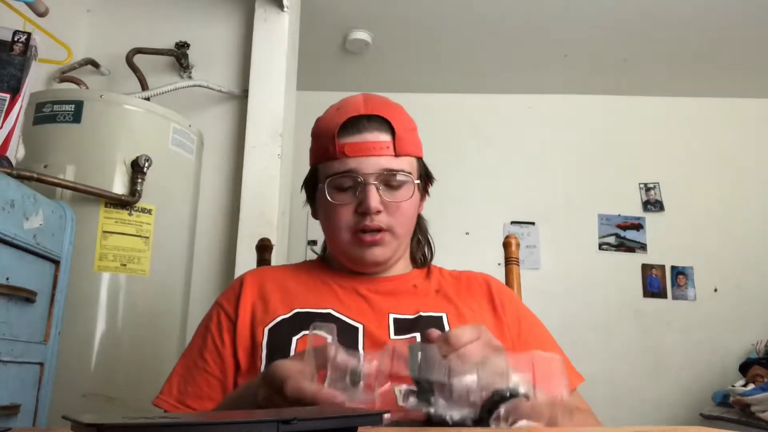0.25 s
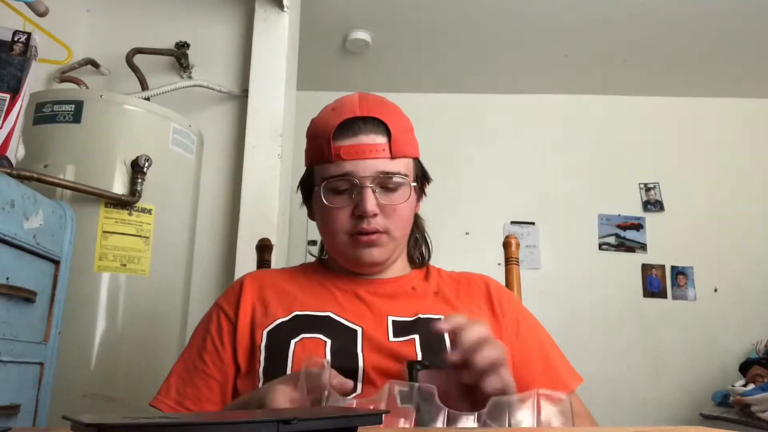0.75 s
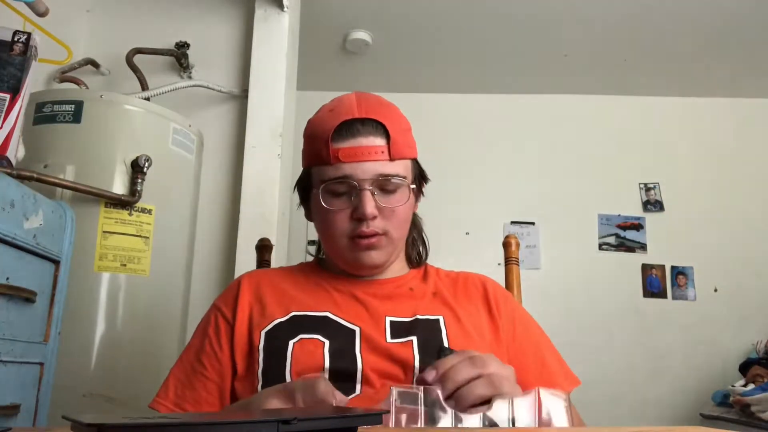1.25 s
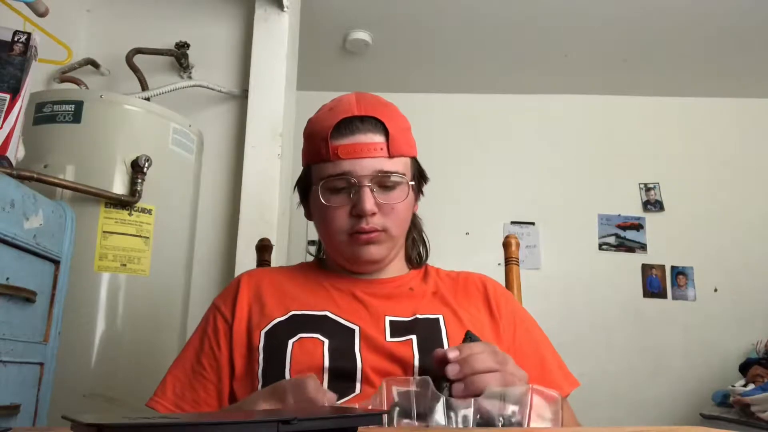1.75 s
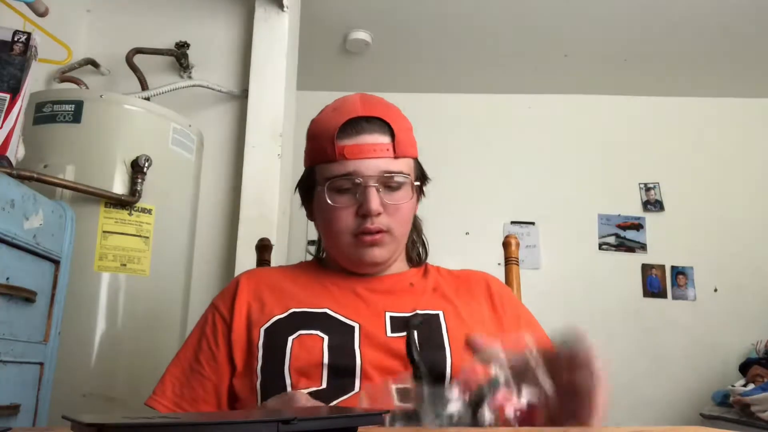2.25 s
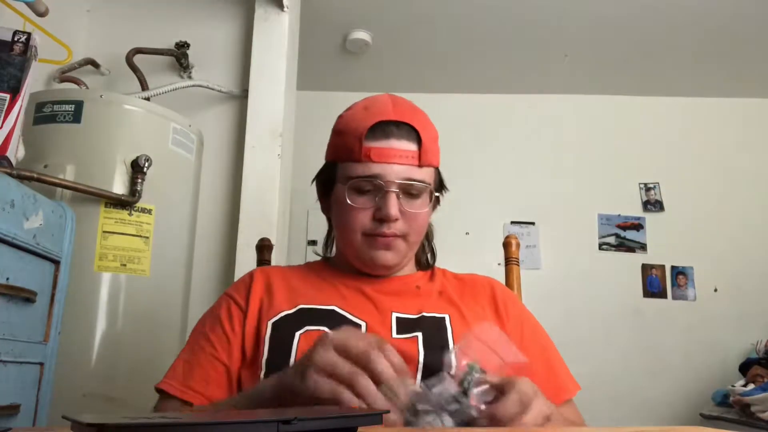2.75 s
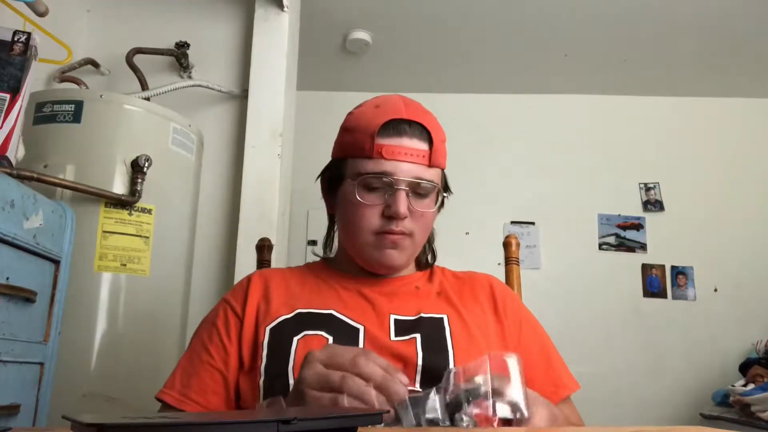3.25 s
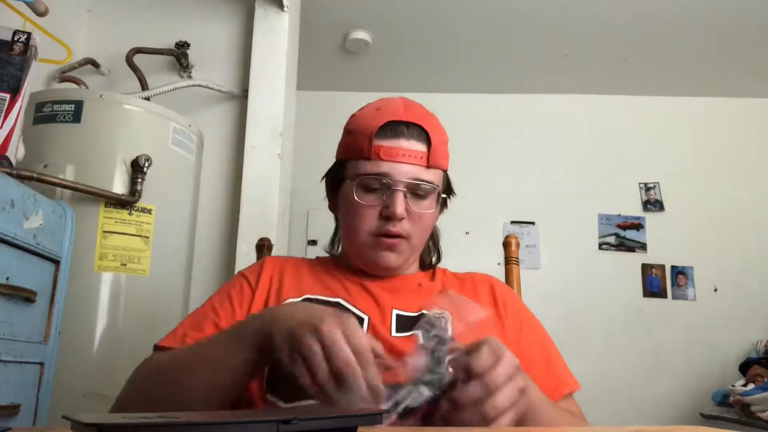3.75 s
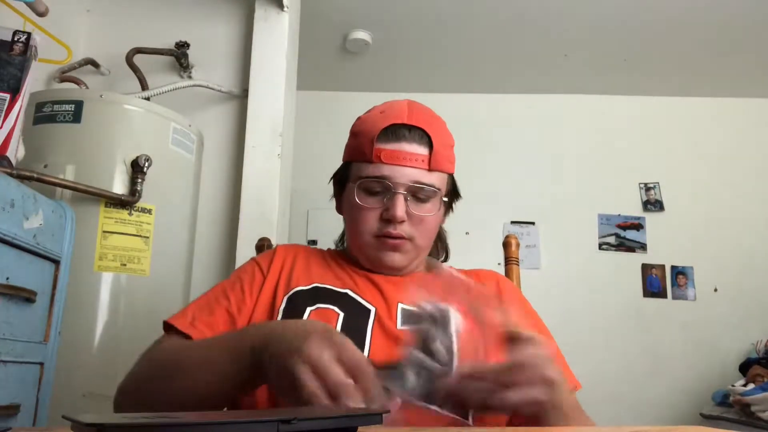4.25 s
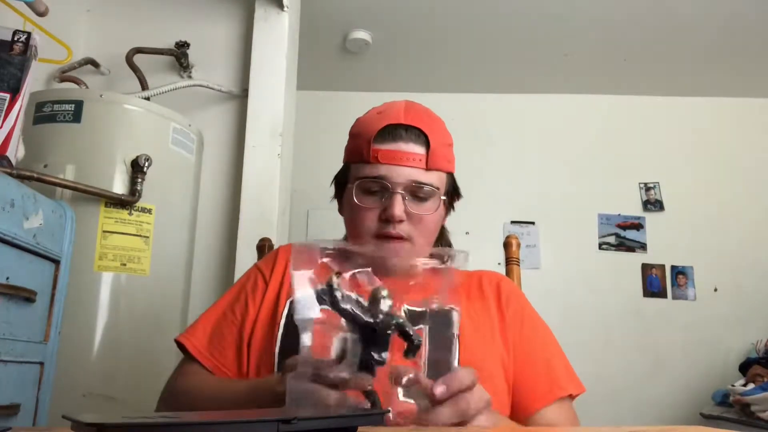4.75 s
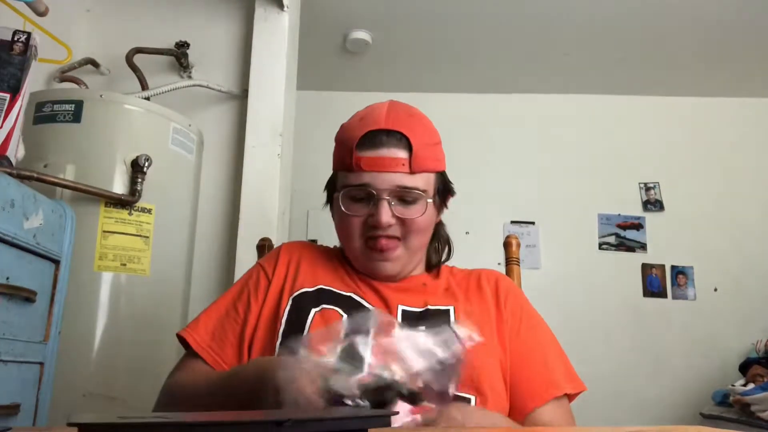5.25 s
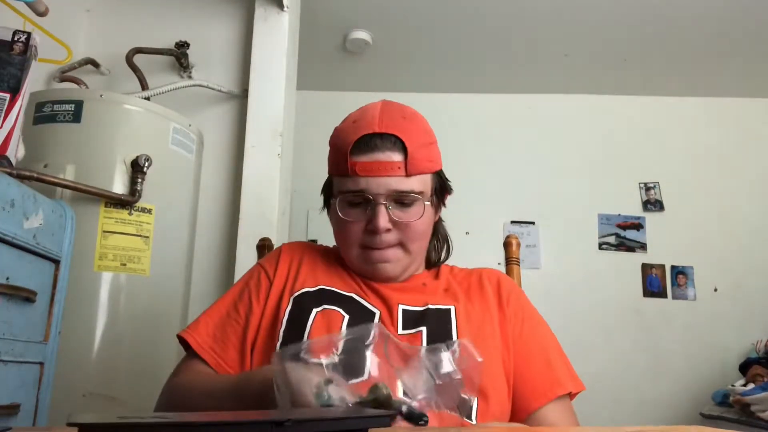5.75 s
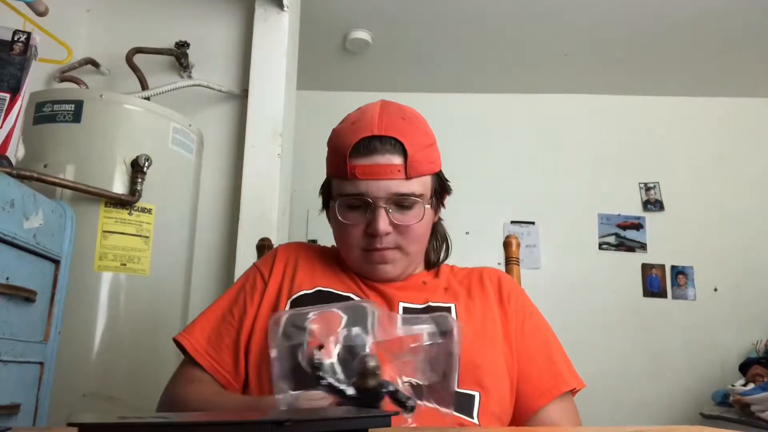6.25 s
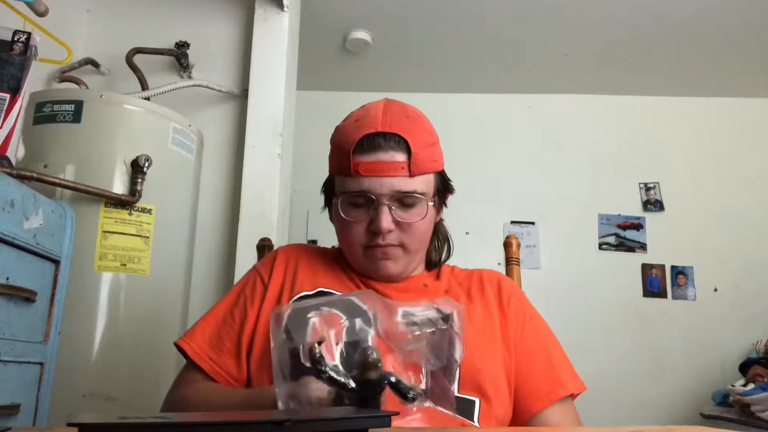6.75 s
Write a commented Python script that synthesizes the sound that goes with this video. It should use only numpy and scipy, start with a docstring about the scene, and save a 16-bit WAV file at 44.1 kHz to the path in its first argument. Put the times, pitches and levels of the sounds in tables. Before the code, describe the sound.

Hands work at a thin moulded plastic tray holding a toy figure, close by in a small bare room. A loud burst of crackling, snaps and hollow pops opens the first 0.3 seconds, with a low rumble through the table. After a near pause, clicks return at about 1 second and build to a sharp, slightly thinner cluster of snaps and pops between 1.3 and 2 seconds. Scattered crunches follow around 2.4 seconds and from 3 to 3.4. From about 3.8 seconds the crinkling is busier and almost continuous, with bright dry ticks, duller knocks and a longer squeeze with lower pops just after 5 seconds. It softens briefly around 5.6, then picks up, with strong snaps near 6.3, 6.4 and 6.7, continuing until about 7 seconds. A short room echo, a faint steady hush and slight table rubbing lie underneath.

```python
"""A small bare room, at a table: hands work a toy figure out of a thin moulded plastic tray.
Many tiny buckles crackle under every squeeze, creases snap, and the tray's pockets pop in and out.
The room answers for about a fifth of a second over a faint hush and the table's rumble."""
import sys
import numpy as np
from scipy import signal
from scipy.fft import rfft, irfft, next_fast_len
from scipy.io import wavfile
from scipy.ndimage import uniform_filter1d, map_coordinates

SR = 44100
rng = np.random.default_rng(int(sys.argv[2]) if len(sys.argv) > 2 else 0)


def dump_mix(stems):
    """Bounce the given channels to the path in sys.argv[1] as a 16-bit WAV at rate SR."""
    frames = np.atleast_2d(stems).T  # one column per channel
    limited = np.clip(frames, -1, 1)  # hard clip at full scale
    pcm = np.round(limited * 32767).astype(np.int16)
    wavfile.write(sys.argv[1], SR, pcm)


N = 308259


def amp(db):
    """dB to gain."""
    return 10 ** (np.asarray(db) / 20)


def unit_rms(x):
    """Scale to rms 1."""
    return x / np.sqrt(np.mean(x ** 2) + 1e-20)


def log_interp(points, hz):
    """Interpolate (frequency, value) points on a log axis."""
    point_hz, values = np.transpose(points)
    return np.interp(np.log(hz + 1), np.log(point_hz + 1), values)


def colour(x, spectrum, size=2048):
    """Minimum-phase filter with this spectrum and unit energy."""
    gain = amp(log_interp(spectrum, np.fft.rfftfreq(size, 1 / SR)))
    cepstrum = irfft(np.log(gain + 1e-6), size)
    cepstrum[1:size // 2] *= 2
    cepstrum[size // 2 + 1:] = 0
    pulse = irfft(np.exp(rfft(cepstrum)), size)
    return signal.fftconvolve(x, pulse / np.linalg.norm(pulse))[:N]


def place(time_s, gains, shapes):
    """Sum rows of short sounds at their times and gains."""
    index = np.round(time_s * SR).astype(int)[:, None] + np.arange(shapes.shape[1])
    return np.bincount(index.ravel(), (gains[:, None] * shapes).ravel(), N + SR)[:N]


def envelope(t, t60_s, attack_s):
    """Exponential rise and decay."""
    return amp(-60 * t / t60_s) * (1 - np.exp(-t / attack_s))


def ring(t, hz, t60_s, attack_s):
    """One damped mode per row."""
    return np.sin(2 * np.pi * hz[:, None] * t) * envelope(t, t60_s, attack_s)


def burst(t, count, t60_s, attack_s):
    """One decaying noise burst per row."""
    return envelope(t, t60_s, attack_s) * rng.standard_normal((count, len(t)))


# Noise floor spectrum: (frequency [Hz], relative density [dB])
HUSH_SPECTRUM = [(18, -27), (33, -27), (55, 5), (152, -3), (315, -3), (1400, -20), (3500, -19),
                 (8000, -31.5), (15500, -30)]


def hush(level_db=-68.5):
    """Steady air and microphone noise."""
    return amp(level_db) * unit_rms(colour(rng.standard_normal(N), HUSH_SPECTRUM, size=8192))


# Hand squeezes: (start [s], hold [s], sheet crackle [dB], wall bending [dB])
SQUEEZES = [(0, 0.01, -35, -22.5), (.05, 0.027, -56, -40), (.13, 0.061, -48.5, -39),
            (0.289, 0.069, -60.5, -48), (1.068, 0.064, -55, -41), (1.23, 0.14, -49, -47.5),
            (1.531, 0.13, -44.5, -38.5), (1.78, 0.061, -54.5, -44.5), (1.921, 0.087, -45.5, -38.5),
            (2.362, 0.12, -49.5, -40), (2.889, 0.082, -63, -45.5), (3.029, 0.039, -48.5, -42.5),
            (3.188, 0.055, -44.5, -40.5), (3.368, 0.089, -48.5, -42), (3.618, 0.069, -57.5, -45.5),
            (3.788, 0.2, -51.5, -45.5), (4.07, 0.056, -48.5, -42), (4.238, .1, -53.5, -44.5),
            (4.492, 0.13, -53, -41.5), (4.72, 0.022, -52.5, -47), (4.86, .14, -51.5, -45.5),
            (5.081, .26, -44.5, -39), (5.41, .14, -55, -50), (5.852, 0.2, -49.5, -43),
            (6.08, 0.15, -49, -46.5), (6.261, 0.032, -43.5, -37.5), (6.388, 0.088, -47.5, -41.5),
            (6.579, 0.055, -49.5, -45), (6.699, 0.15, -49, -42.5), (6.919, 0.025, -50.5, -49)]


def effort(time_s, part, grip_db_per_s=338, ease_db_per_s=181):
    """Gain of "sheet" or "walls": each squeeze sets in, holds and eases to a resting grip."""
    start_s, hold_s, sheet_db, walls_db = np.transpose(SQUEEZES)[:, :, None]
    held_db, resting_db = {"sheet": (sheet_db, -72.5), "walls": (walls_db, -66.5)}[part]
    before_db = np.maximum(grip_db_per_s * (start_s - time_s), 0)
    after_db = np.maximum(ease_db_per_s * (time_s - start_s - hold_s), 0)
    return amp(np.maximum((held_db - before_db - after_db).max(axis=0), resting_db))


def buckles(shapes, part, spread_db):
    """Tiny buckles at random times, most faint, a few strong, as loud as the squeeze."""
    when, strength = rng.random((len(shapes), 2)).T
    time_s = when * N / SR
    sizes = amp(np.minimum(-spread_db * np.log(1 - strength), 11))
    mean_power = np.sum((sizes[:, None] * shapes) ** 2) / N
    return place(time_s, effort(time_s, part) * sizes / np.sqrt(mean_power), shapes)


# Bright plastic sheet: (frequency [Hz], relative density [dB])
SHEET_SPECTRUM = [(1200, -24.5), (2000, -8), (3400, -0.5), (6500, -7), (7800, -8), (8400, -12.5),
                  (11000, -15.5), (15500, -21)]
# Dull tray walls: (frequency [Hz], relative density [dB])
WALL_SPECTRUM = [(53, -30), (90, -35), (168, -5.5), (238, -2.5), (458, -0.5), (1070, -0.5), (1430, 0.5),
                 (2500, -9.5), (3250, -16), (5500, -120)]


def squeeze_crackle(count=1500):
    """The squeezed sheet ticks drily; the walls give softer, faintly pitched crunches."""
    t = np.arange(SR // 40) / SR
    ticks = burst(t, count, t60_s=0.009, attack_s=0.0003)
    crunch_hz = rng.uniform(250, 1850, count)
    crunches = burst(t, count, t60_s=0.013, attack_s=0.00046)
    crunches += amp(-15) * ring(t, crunch_hz, t60_s=0.031, attack_s=0.0003)
    sheet = colour(buckles(ticks, "sheet", spread_db=2.0), SHEET_SPECTRUM)
    walls = colour(buckles(crunches, "walls", spread_db=4.5), WALL_SPECTRUM)
    return amp(-4) * sheet + amp(-5.5) * walls


# Hands and tray rubbing on the table top: (time [s], base level [dB])
RUBBING = [(0, -48), (.3, -82), (.5, -83), (1.9, -75), (2.5, -61.5), (2.7, -68), (4.2, -68), (4.7, -61.5),
           (5.3, -63.5), (5.6, -72), (6.99, -65)]


def table_rumble(lumps_per_s=20, lump_db=4.8, press_db_per_db=0.15):
    """Low, lumpy rumble through the table top, stronger as the hands bear down."""
    time_s, base_db = np.transpose(RUBBING)
    t = np.arange(N) / SR
    band = signal.butter(2, [50, 170], "band", fs=SR, output="sos")
    rumble = signal.sosfilt(band, rng.standard_normal(N))
    lumps = amp(lump_db * map_coordinates(rng.standard_normal(200), [t * lumps_per_s]))
    pressure = unit_rms(effort(t, "walls") ** press_db_per_db)
    return amp(np.interp(t, time_s, base_db)) * unit_rms(rumble * lumps) * pressure


# Single creases buckling: (time [s], level [dB], knock re level [dB])
SNAPS = [(0.001, -23, 7), (0.0457, -19, 0.5), (0.0711, -14, -6), (0.183, -30.5, -16), (0.2455, -42, -12),
         (0.2714, -33, 12), (0.7111, -46.5, 1.5), (0.9772, -42.5, 12.5), (1.055, -41.5, 6),
         (1.138, -35, -15), (1.2505, -36, 5), (1.269, -38, 10), (1.3281, -22.5, 10), (1.3433, -26.5, 2),
         (1.4302, -38, 5), (1.4608, -27, 4.5), (1.5289, -45, -6), (1.5563, -21, -2), (1.575, -25.5, -2),
         (1.5853, -20, 1.5), (1.6078, -21, -22), (1.6355, -20.5, 10.5), (1.933, -33, 4), (2.235, -48, 9),
         (2.3157, -50, -16), (2.354, -32.5, -2), (2.4075, -29.5, -19), (2.6878, -51.5, 16),
         (2.824, -51, 10.5), (2.8815, -47, 17), (2.9581, -37.5, 6), (3.066, -27, -8.5),
         (3.1815, -41.5, 19.5), (3.224, -32.5, -11), (3.3766, -29, 2.5), (3.7309, -48, -1),
         (3.779, -33, 6.5), (3.8213, -31, 6.5), (3.8381, -25, 1), (3.8918, -32.5, -20), (3.96, -36.5, -26),
         (4.0693, -31, -16), (4.23, -33.5, 6), (4.243, -25, 3), (4.36, -38.5, -5), (4.476, -35, -5),
         (4.5028, -32, 0), (4.5367, -32.5, 5), (4.615, -35.5, -12), (4.6343, -35, 6), (4.6817, -33, -24),
         (4.776, -35.5, 9.5), (4.8414, -37, 12), (4.9113, -31.5, 6.5), (4.9452, -36, -7),
         (4.9635, -29.5, 3), (5.048, -32, -17), (5.0737, -31.5, -2), (5.1152, -37, 10), (5.1598, -34, 7.5),
         (5.421, -39, 6.5), (5.436, -33.5, 0), (5.4974, -32.5, 3.5), (5.5862, -36.5, -12),
         (5.6506, -43, 4.5), (5.678, -42, 15), (5.8155, -41, 4), (5.8436, -39.5, 10), (5.931, -25.5, -28),
         (6.1575, -35.5, 9.5), (6.179, -32, -2), (6.2605, -39, -15), (6.2934, -23, 2),
         (6.4483, -22.5, -1.5), (6.5331, -37, -18), (6.6096, -32, 2.5), (6.692, -30.5, 7.5),
         (6.7224, -28.5, 4), (6.788, -33, -36), (6.921, -36.5, -19)]


def crease_snaps(facet_hz=3386, log_spread=0.231):
    """A crease lets go in milliseconds: a crack, a brief ring of its facet, a knock in the walls."""
    time_s, level_db, knock_db = np.transpose(SNAPS)
    count = len(time_s)
    t = np.arange(SR // 25) / SR
    hz = facet_hz * np.exp(log_spread * rng.standard_normal(count))
    crack = place(time_s, amp(level_db + 2.5), burst(t, count, t60_s=0.01, attack_s=0.0005))
    facet = place(time_s, amp(level_db - 3.5), ring(t, hz, t60_s=0.0069, attack_s=0.00033))
    knock = place(time_s, amp(level_db + knock_db), burst(t, count, t60_s=0.022, attack_s=0.0032))
    return colour(crack, SHEET_SPECTRUM) + facet + colour(knock, WALL_SPECTRUM)


# Pockets flipping in or out: (time [s], level [dB], pitch [Hz])
POPS = [(0.012, -25, 1050), (0.073, -31, 1170), (0.176, -24.5, 572), (0.276, -26.5, 1134),
        (0.977, -35.5, 783), (1.138, -29.5, 762), (1.25, -25, 1386), (1.331, -21, 637), (1.557, -22.5, 740),
        (1.608, -22, 1400), (1.635, -18.5, 1445), (1.753, -18.5, 531), (1.909, -35, 1600),
        (1.952, -28.5, 1466), (2.469, -25.5, 570), (3.181, -30, 1476), (3.819, -27, 1610),
        (4.132, -30, 950), (4.634, -30, 877), (4.776, -29, 900), (4.843, -26.5, 854), (5.11, -28, 274),
        (5.164, -27.5, 303), (5.294, -34.5, 391), (5.679, -35, 383), (5.813, -35.5, 1556),
        (6.051, -31.5, 512), (6.098, -24.5, 947), (6.179, -30.5, 843), (6.32, -30, 414),
        (6.448, -21.5, 1430), (6.656, -37, 440), (6.722, -25.5, 870)]


def pocket_pops():
    """A pocket rings at its pitch and two scattered modes above; big, low pockets ring longer."""
    time_s, level_db, hz = np.transpose(POPS)
    t = np.arange(SR // 8) / SR
    t60_s = 0.054 * (600 / hz[:, None]) ** 0.39
    detune = np.exp([0.091, 0.12] * rng.standard_normal((len(hz), 2)))
    modes = ring(t, hz, t60_s, attack_s=0.00081)
    modes += amp(-4) * ring(t, 1.427 * hz * detune[:, 0], 0.5 * t60_s, attack_s=0.00036)
    modes += amp(-5) * ring(t, 2.3 * hz * detune[:, 1], 0.4 * t60_s, attack_s=0.001)
    # fingers on the wall make the ringing stumble
    stumble = unit_rms(uniform_filter1d(rng.standard_normal(modes.shape), size=130, axis=1))
    return place(time_s, amp(level_db - 2.5), modes * (1 + 0.5 * stumble))


def highpass(x, hz, order):
    """Butterworth high-pass."""
    return signal.sosfilt(signal.butter(order, hz, "high", fs=SR, output="sos"), x)


def tray_radiation(x, lying_from_s=0.9, lying_until_s=2.25):
    """The small tray radiates little bass; lying on the table, less bass and less treble."""
    t = np.arange(N) / SR
    lifted = highpass(x, hz=173, order=3)
    lying = highpass(x, hz=420, order=2)
    lying -= 0.3 * highpass(lying, hz=7000, order=1)
    return np.where((t > lying_from_s) & (t < lying_until_s), lying, lifted)


# Room decay: (frequency [Hz], T60 [s])
ROOM_DECAY = [(200, 0.28), (1400, 0.15), (12000, 0.12)]


def room_reverb(x, spots=16, hop_samples=300, delay_samples=150):
    """Every few milliseconds sound leaves another spot of the tray, which the room answers differently."""
    hz, t, noise = signal.stft(rng.standard_normal((spots, SR // 3)), SR, nperseg=256)
    decay = amp(-60 * t / log_interp(ROOM_DECAY, hz)[:, None])
    _, tails = signal.istft(noise * decay, SR, nperseg=256)
    tails /= np.linalg.norm(tails[0])
    offset_hops = (np.arange(N) / hop_samples - np.arange(spots)[:, None]) % spots - 1
    crossfade = np.cos(np.pi / 2 * np.clip(offset_hops, -1, 1))
    wet = signal.fftconvolve(crossfade * x, tails, axes=1).sum(axis=0)
    return np.pad(wet, (delay_samples, 0))[:N]


def scene():
    """Tray, room, table and hush, mono."""
    tray = tray_radiation(crease_snaps() + pocket_pops() + squeeze_crackle())
    return (tray + amp(-2.5) * room_reverb(tray) + table_rumble() + hush())[None]


def record(dry, cutoff_hz=15800):
    """Brick-wall low-pass."""
    size = next_fast_len(N + SR)
    passband = np.fft.rfftfreq(size, 1 / SR) < cutoff_hz
    return irfft(rfft(dry, size) * passband, size)[:, :N]


dry = scene()
out = record(dry)
dump_mix(out)
```